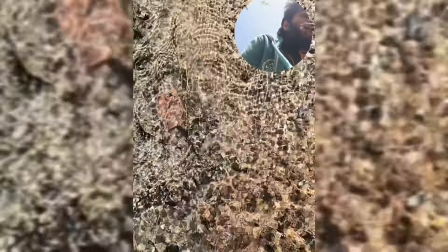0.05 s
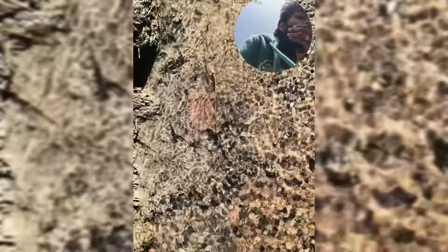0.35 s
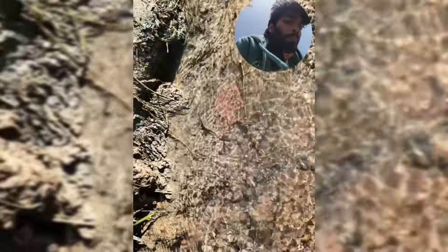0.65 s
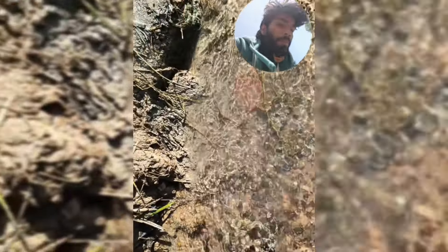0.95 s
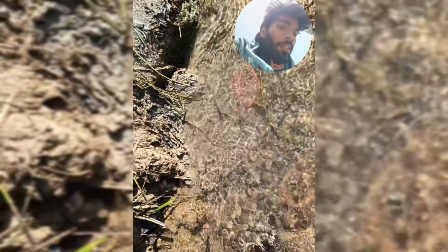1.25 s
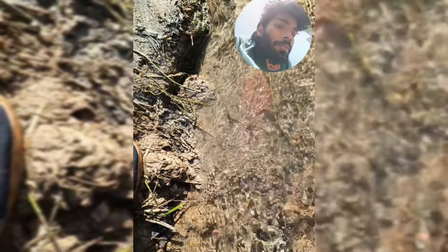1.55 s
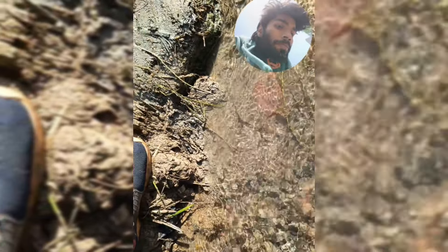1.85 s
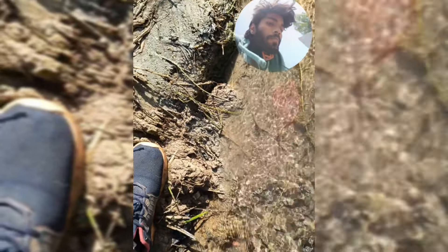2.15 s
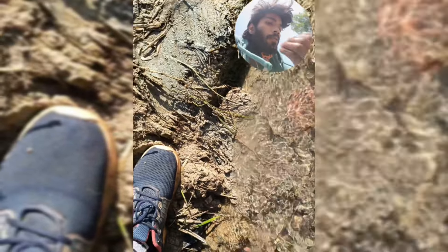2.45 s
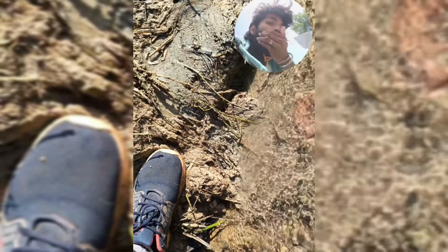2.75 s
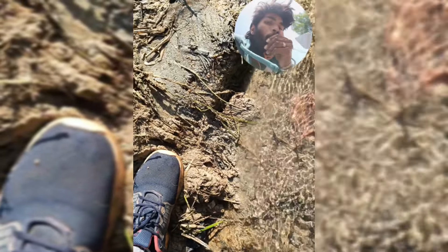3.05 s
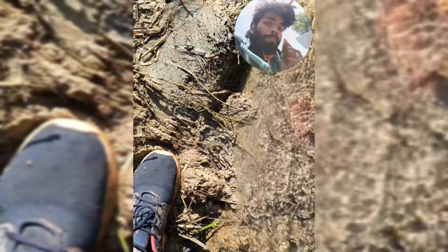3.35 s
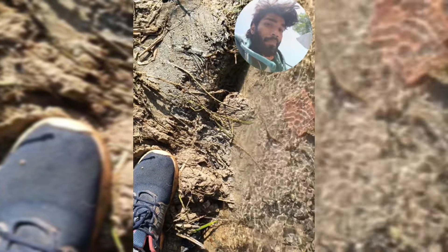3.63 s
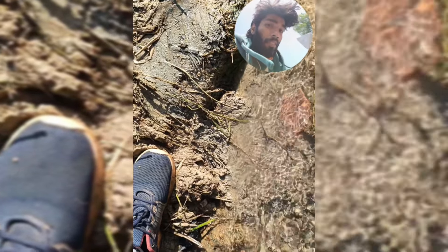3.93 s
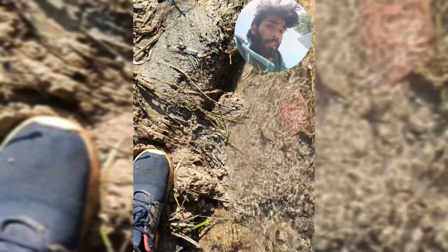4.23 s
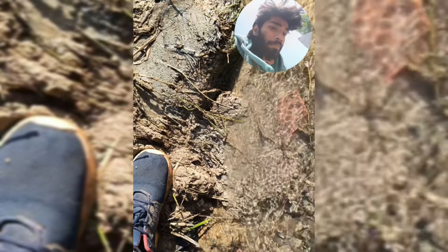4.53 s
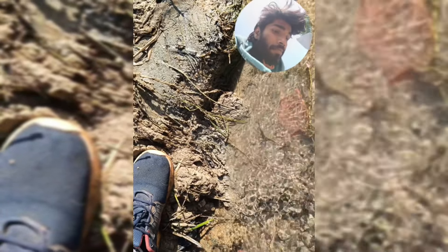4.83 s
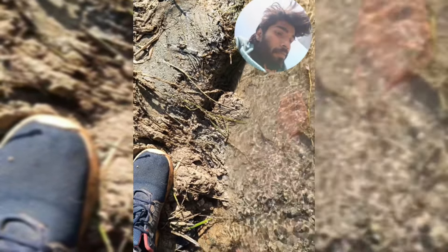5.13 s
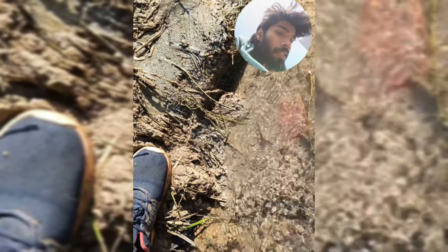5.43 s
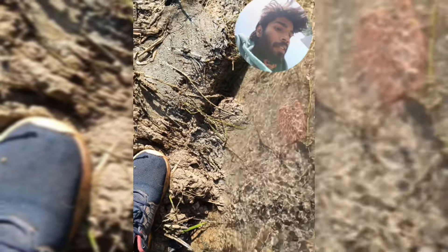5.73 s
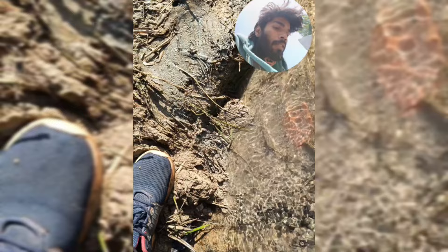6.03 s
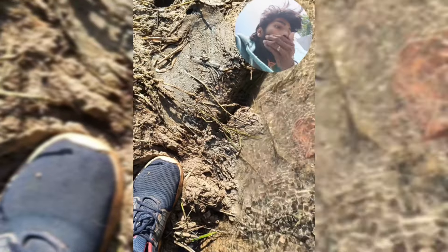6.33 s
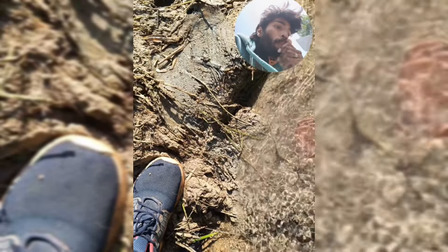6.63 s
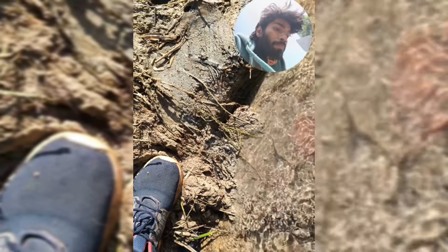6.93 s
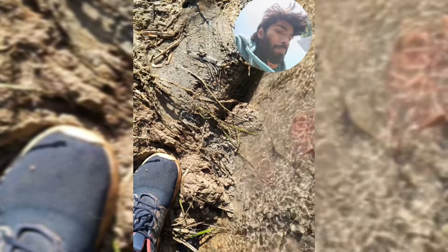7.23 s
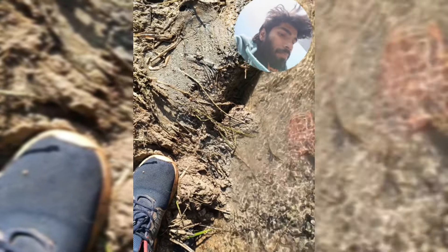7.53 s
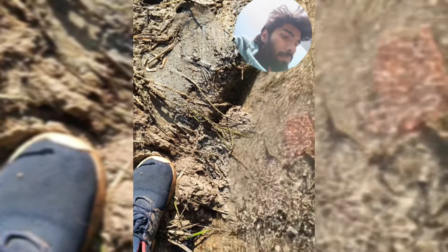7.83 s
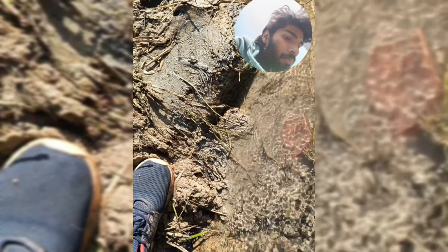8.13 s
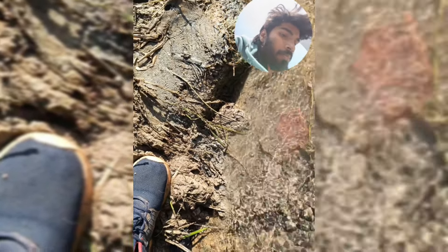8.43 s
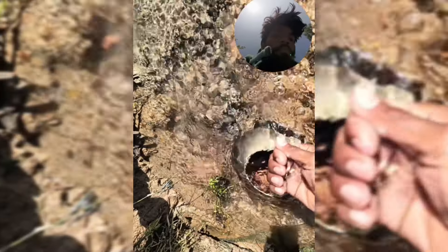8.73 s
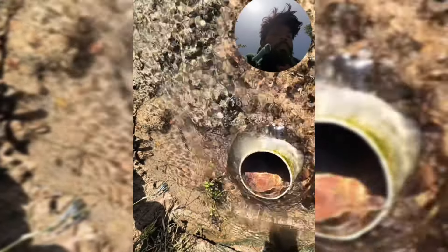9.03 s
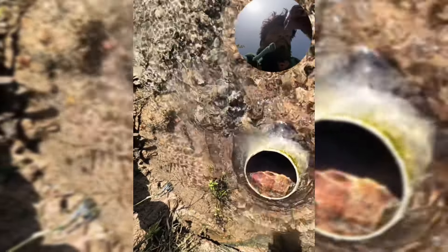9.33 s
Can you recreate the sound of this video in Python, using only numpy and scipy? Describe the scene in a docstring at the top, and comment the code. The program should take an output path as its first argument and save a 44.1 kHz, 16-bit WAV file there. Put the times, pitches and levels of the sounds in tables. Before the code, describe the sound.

Close to the microphone, a small outdoor stream gurgles and plops as it runs from a pipe. Irregular splashes and ticking droplets come throughout as a hand dips into the flow. A person slurps from the palm at the start, again a little later and once past the middle, with soft gulps between. A light wind rumbles underneath and thumps the microphone twice around halfway.

```python
"""Bubbles plop and chirp over a fine gurgle as water wells out of an old pipe and runs down a shallow ditch.
Each bubble rings with a short note, higher the smaller it is. A hand scoops from the flow and spills it
again: every splash churns the stream and throws up spray, and twice an air pocket opens with a falling
whistle. Sips slurped from the palm ring the mouth, and swallows ring the throat.
A light wind rumbles on the two microphones."""
import sys
import numpy as np
from scipy import signal
from scipy.fft import rfft, irfft, next_fast_len
from scipy.io import wavfile
from scipy.ndimage import map_coordinates

SR = 44100
rng = np.random.default_rng(int(sys.argv[2]) if len(sys.argv) > 2 else 0)


def store_wav(level_fs):
    """Save 16-bit WAV to argv[1]."""
    pcm = np.round(np.clip(np.atleast_2d(level_fs), -1, 1) * 32767)
    wavfile.write(sys.argv[1], SR, pcm.T.astype(np.int16))


N = 422478
TIME = np.arange(N) / SR
MIDDLING_CHURN_DB = -44  # churning counts as hard above this level

# How the water's sound sits between the two microphones; it shifts near 8.6 s. Each row: time in seconds, delay
# at the left microphone in ms, left minus right in dB, boost of the finest spray in dB.
WATER_STEREO = [(8.55, 0.28, 3.5, 0.5), (8.8, 0.061, 6.5, 1.5)]
# The hand stirs or spills the water. Each row: time it is fully built up in seconds,
# build-up in seconds, hold in seconds, churn level in dB, spray level in dB.
SPLASHES = [(0.134, .08, .2, -47, -58), (0.768, .14, .11, -45, -50), (1.023, 0.032, .47, -50, -61),
            (1.707, .03, .17, -36, -48), (1.898, .03, .14, -37, -45), (2.048, .02, .17, -43, -53),
            (2.325, .02, .14, -45, -54), (2.819, .08, .11, -42, -49.5), (3.11, .03, .16, -43, -45),
            (3.323, .03, .1, -48, -51), (3.671, .03, .04, -49, -49), (4.148, .04, .2, -46, -65.5),
            (4.655, .03, .19, -50.5, -68), (5.304, .015, .05, -39, -48.5), (5.412, .07, .27, -36, -47),
            (5.82, .02, .2, -43, -52.5), (6.076, .03, .06, -43, -46.5), (6.35, .05, .17, -44, -54),
            (6.712, .05, .27, -52.5, -54), (7.104, .03, .12, -52, -63), (7.412, .02, .03, -53.5, -61),
            (7.989, .18, .1, -48, -52.5), (8.193, .08, .16, -32, -41), (8.45, .05, .17, -37, -47),
            (8.738, .03, .17, -39.5, -48), (9.001, .03, .26, -41, -53), (9.42, .07, .14, -39, -49)]
# The tone of a tiny tick of water. Each row: frequency in Hz, gain in dB.
TICK_TONE = [(1000, -1), (3500, 8.5), (7000, 14), (8300, -18.5), (16000, -7)]


def amp(db):
    """Turn decibels into a gain."""
    return 10 ** (np.asarray(db) / 20)


def unit(x):
    """Scale x to an average (rms) level of 1."""
    return x / np.sqrt(np.mean(x ** 2) + 1e-20)


def along(points, hz):
    """Read between (Hz, value) points on a log frequency scale."""
    frequencies, values = np.transpose(points)
    return np.interp(np.log(hz + 1), np.log(frequencies + 1), values)


def curves(rows, when):
    """Read each column after the time at the given moments."""
    times, *columns = np.transpose(rows)
    return [np.interp(when, times, column) for column in columns]


def wobble(rate):
    """A smooth random curve through `rate` new values a second."""
    return map_coordinates(rng.standard_normal(int(N * rate / SR) + 4), [TIME * rate])


def filtered(x, response):
    """Give each frequency in x the gain response(hz)."""
    size = next_fast_len(N + SR // 2)
    return irfft(rfft(x, size) * response(np.fft.rfftfreq(size, 1 / SR)), size)[..., :N]


def coloured(x, tone):
    """Shape x with (Hz, dB) points, then scale it to level 1."""
    return unit(filtered(x, lambda hz: amp(along(tone, hz))))


def noise_pair(shared):
    """White noise for two microphones, with a share in common."""
    return np.sqrt(shared) * rng.standard_normal(N) + np.sqrt(1 - shared) * rng.standard_normal((2, N))


def add(out, start, sound):
    """Mix a sound in at `start` seconds."""
    room = out[..., max(0, round(start * SR)):][..., :sound.shape[-1]]
    room += sound[..., :room.shape[-1]]


def wind():
    """Wind rumbles on the microphones, more on the right; a puff is a few slow swings of pressure."""
    # The wind's strength. Each row: time in seconds, level in dB.
    strength = [(0, -52), (5.3, -53), (5.45, -44.5), (5.8, -47), (5.95, -49.5), (9.58, -55.5)]
    # The rumble's tone. Each row: frequency in Hz, gain in dB.
    rumble_tone = [(15, -6), (30, 1), (50, 3.5), (80, -4.5), (125, -11), (250, -22.5), (500, -26.5),
                   (2000, -54), (10000, -48)]
    # Thumping puffs. Each row: start in seconds, length in seconds, level in dB, pitch in Hz.
    puffs = [(5.357, 0.066, -26.5, 53), (5.722, 0.1, -30.5, 42)]
    air = amp(curves(strength, TIME)[0] + 3.1 * wobble(14)) * coloured(noise_pair(.78), rumble_tone)
    for start, length, db, hz in puffs:
        t = np.arange(int(length * SR)) / SR
        swings = np.sin(2 * np.pi * hz * t + rng.standard_normal((2, 1)))
        add(air, start, amp(db) * np.hanning(len(t)) * swings)
    return air * amp([[-2.5], [2.5]])


def bank_echo(water):
    """The earth banks and the restless surface scatter a very short echo that keeps changing."""
    # The echo's length. Each row: frequency in Hz, seconds to fade by 60 dB.
    fade_times = [(300, 0.11), (1500, 0.052), (10000, 0.047)]
    hz, t, noise = signal.stft(rng.standard_normal((4, 2, SR // 6)), SR, nperseg=128)
    tails = signal.istft(noise * amp(-60 * t / along(fade_times, hz)[:, None]), SR, nperseg=128)[1]
    shares = np.array([wobble(12) for _ in tails])  # the sound drifts among four echoes
    shares /= np.linalg.norm(shares, axis=0)
    echo = np.zeros((2, N))
    for share, tail in zip(shares, tails):
        delayed = np.pad(water * share, ((0, 0), (SR // 400, 0)))
        echo += signal.fftconvolve(delayed, tail / np.linalg.norm(tail[0]), axes=1)[:, :N]
    return echo


def gulps(squeezes_per_s=135, ring_s=.0041, fall_octaves_per_s=2.4):
    """A swallow squeezes water down the throat; each squeeze rings a hollow note, lower than the last."""
    # Each row: start in seconds, length in seconds, level in dB, pitch in Hz, overtone gain in dB.
    swallows = [(1.384, .019, -30.5, 356, -1), (1.412, .008, -29.5, 410, -23),
                (3.49, .006, -35.5, 392, -15), (7.649, .033, -29.5, 532, -33)]
    out, t = np.zeros(N), np.arange(SR // 40) / SR
    knock = (1 - np.exp(-2 * t / ring_s)) * np.exp(-(t / ring_s) ** 2)
    for start, length, db, hz, overtone_db in swallows:
        for after in np.arange(0, length, 1 / squeezes_per_s):
            jitter, strength = rng.uniform(-1.2, 1, 2)
            phase = 2 * np.pi * hz * 2 ** (-fall_octaves_per_s * after) * t
            note = np.sin(phase) + amp(overtone_db) * np.sin(2 * phase)
            add(out, start + after + .0013 * jitter, amp(db + 3 * strength) * knock / knock.max() * note)
    return out


def mouth(hz):
    """How the hollow of the mouth answers a push at the lips, at each frequency."""
    # The notes the mouth rings at. Each row: pitch in Hz, width in Hz, gain in dB.
    resonances = [(327, 166, -3.5), (563, 280, -8.5), (1355, 300, 0.5), (1714, 210, 6.5), (3440, 620, -51)]
    # The tone of the lips touching. Each row: frequency in Hz, gain in dB.
    lip_tone = [(100, 1.5), (180, -8), (270, 7), (3500, -12.5), (7000, -12), (8500, -66), (16000, -33)]
    ringing = sum(amp(db) * 1j * hz * width / (pitch ** 2 - hz ** 2 + 1j * hz * width)
                  for pitch, width, db in resonances)
    return ringing * amp(along(lip_tone, hz))


def sips():
    """Smacking lips and sputtering water ring the mouth, which takes a new shape for each sip."""
    # Each row: start in seconds, end in seconds, level in dB, factor on the mouth's pitches.
    slurps = [(0.198, 0.252, -32.5, 1.01), (0.319, 0.366, -32, 0.91), (2.663, 2.927, -36, 1.013),
              (6.335, 6.526, -35.5, 1.086)]
    # Each row: time in seconds, strength in dB, softness of the touch in ms.
    lip_smacks = [(0.213, -29, .2), (0.223, -7, 0.35), (0.234, -12.5, 0.25), (0.336, -25, .2),
                  (2.754, -8, 0.2), (2.783, -12.5, 0.16), (2.833, -18, .25), (2.874, -18, 0.087),
                  (6.339, -20, .3), (6.369, -13.5, 0.35), (6.388, -23.5, .25), (6.449, -10, 0.39),
                  (6.47, -21, 0.21)]
    out = np.zeros((2, N))
    sputter = noise_pair(.85) * amp(3 * np.clip(wobble(300), -2, 1.5) + 4 * np.clip(wobble(90), -2, 1.2))
    sputter /= np.std(filtered(sputter, mouth))
    for start, end, level_db, shape in slurps:
        smacks, suction = np.zeros(N), np.zeros(N)
        add(suction, start, amp(level_db) * signal.windows.tukey(int((end - start) * SR), .3))
        for when, db, soft_ms in lip_smacks:
            if start - .05 < when < end + .05:
                touch = signal.windows.gaussian(SR // 250, soft_ms * SR / 1000)
                add(smacks, when - .002, amp(db + 30) * touch / touch.sum())
        out += filtered(smacks + suction * sputter, lambda hz: mouth(hz / shape))
    return out


def splash_level(peaks_db, calm_db, fall_db_per_s, sag_db_per_s=5):
    """Level in dB of the calm stream plus its splashes: each builds up, sags as it holds and dies away."""
    power = np.full(N, amp(calm_db) ** 2)
    for (peak_time, build, hold, *_), db in zip(SPLASHES, peaks_db):
        t = np.arange(int((build + hold + .5) * SR)) / SR - build
        lost_db = sag_db_per_s * np.maximum(t, 0) + fall_db_per_s * np.maximum(t - hold, 0)
        add(power, peak_time - build, (np.minimum(1 + t / build, 1) * amp(db - lost_db)) ** 2)
    return 10 * np.log10(power)


def bubble_notes(rows, scatter_ms, onset):
    """Each bubble is a short sine: it swells as it pinches off, glides as it nears the surface, and dies."""
    out = np.zeros((2, N))
    lags_ms = curves(WATER_STEREO, np.transpose(rows)[0])[0] + scatter_ms * rng.standard_normal(len(rows))
    for (start, db, hz, life, glide, pan_db), lag in zip(rows, lags_ms / 1000):
        t = np.maximum(np.arange(int(4 * life * SR) + 32) / SR - [[lag / 2], [-lag / 2]], 0)
        pitch = hz * 2 ** (.8 * np.tanh(glide * t / .8))  # glides 0.8 octaves at most
        phase = 2 * np.pi * np.cumsum(pitch * np.diff(t, prepend=0), axis=1)
        swell = (1 - np.exp(-t / (onset * life))) * np.exp(-(t / life) ** 1.5)
        add(out, start, amp([[db + pan_db / 2], [db - pan_db / 2]]) * swell * np.sin(phase))
    return out


def swarm(level_db, count, low_hz, high_hz, cycles, rise, spread_db):
    """Random bubbles at level 1: small ones are high and brief; in splashes they crowd and are cut short."""
    when, smallness, strength = rng.random((count, 3)).T
    lasting, bend, side = rng.standard_normal((count, 3)).T
    crowd_db = .25 * level_db
    births = np.cumsum(amp(crowd_db) ** 2)
    starts = np.interp(when, births / births[-1], TIME)
    hz = low_hz * (high_hz / low_hz) ** smallness
    crowding_db = np.interp(starts, TIME, crowd_db - crowd_db.mean())
    life = cycles / hz * np.exp(np.minimum(lasting, 1) / 2) * amp(-.7 * crowding_db)
    db = spread_db * strength - crowding_db / 2
    glide = rise * (1 + 2 * bend) / life
    rows = np.transpose([starts, db, hz, life, glide, 2 * side])
    return unit(bubble_notes(rows, scatter_ms=.13, onset=.35))


def gurgle(churn_db, wash_db=-8.5, murmur_db=-59.5):
    """Middle-sized bubbles drown in a wash as the stream churns harder; farther down, the ditch murmurs."""
    # The tone of rushing water. Each row: frequency in Hz, gain in dB.
    wash_tone = [(180, -6.5), (380, -8), (620, -3.5), (850, -5.5), (1250, 1), (1900, -6), (2700, -13.5),
                 (5000, -25), (10000, -65)]
    harder_db = churn_db - MIDDLING_CHURN_DB
    crowd = swarm(churn_db, count=1900, low_hz=520, high_hz=2700, cycles=8, rise=.02, spread_db=14)
    bubbles = coloured(crowd, [(300, -30), (600, -11), (1100, 1.5), (1900, 2.5), (3000, -7.5)])
    bubbles *= amp(-.15 * np.maximum(harder_db, 0))
    wash = coloured(noise_pair(.35) * amp(4 * np.clip(wobble(130), -2, 1.7)), wash_tone)
    murmur = coloured(noise_pair(.35) * amp(4 * wobble(40)), wash_tone)
    return amp(churn_db) * (bubbles + amp(wash_db + .2 * harder_db) * wash) + amp(murmur_db) * murmur


def trickle(churn_db):
    """Small bubbles tinkle and larger ones plop all the time; hard churning drags big ones under to glug."""
    small = swarm(churn_db, count=900, low_hz=2000, high_hz=5200, cycles=4.5, rise=0, spread_db=24)
    larger = swarm(churn_db, count=200, low_hz=600, high_hz=1300, cycles=7, rise=.025, spread_db=7)
    glugs = swarm(churn_db, count=260, low_hz=440, high_hz=880, cycles=6, rise=.03, spread_db=7)
    harder_db = churn_db - MIDDLING_CHURN_DB
    flow = amp(.4 * harder_db)
    return flow * (amp(-62) * small + amp(-46) * larger) + amp(-58 + 2.3 * harder_db) * glugs


def spray(spray_db, middling_db=-54, drops_per_s=450):
    """Tiny bubbles tinkle, droplets tick, bursting films crackle and fine drops patter in clumps."""
    # The tone of the fine drops. Each row: frequency in Hz, gain in dB.
    patter_tone = [(800, -30), (2000, -14), (3500, 10), (5000, 4), (6900, 5.5), (8200, -7), (12000, -4),
                   (16000, -7.5)]
    tinkle = swarm(spray_db, count=1500, low_hz=2300, high_hz=7300, cycles=10, rise=.015, spread_db=14)
    tinkle *= amp(2.2 * wobble(900))
    droplets = swarm(spray_db, count=420, low_hz=2000, high_hz=8000, cycles=6, rise=.03, spread_db=20)
    bursts = swarm(spray_db, count=2000, low_hz=2500, high_hz=15000, cycles=6, rise=0, spread_db=25)
    crackle = coloured(bursts, [(2500, -7), (4000, -2), (6900, 2), (8300, -4), (15000, -2)])
    drops = (rng.random(N) < drops_per_s / SR) * amp(16 * rng.random(N))
    drop_fades = np.sqrt(signal.lfilter([1], [1, -np.exp(-1 / (.0016 * SR))], drops ** 2))
    patter = coloured(drop_fades * noise_pair(.016), patter_tone)
    clumps = unit(amp(5.5 * np.clip(wobble(80), -2, 1.6)))
    thick = amp(.2 * (spray_db - middling_db))  # thick spray turns from single notes to patter
    fine = amp(-3.5) * crackle + amp(-6.5) * thick * patter
    fine *= clumps * amp(curves(WATER_STEREO, TIME)[2])
    return amp(spray_db) * (amp(-7) * tinkle + amp(-4) * droplets / thick + fine)


def slaps(spray_db, sharpness=4.6):
    """A drop hits with a tick and spatter that ring the dent it makes; stray drops fall at random."""
    # Each row: start in seconds, strength in dB, pitch in Hz, fade time of the spatter in ms.
    drops = [(0.1912, -28.5, 2140, 1.9), (0.3072, -22.5, 2490, 0.81), (0.355, -35, 1500, 2.2),
             (0.664, -32, 5700, 2.7), (1.1675, -40, 2430, 2.8), (1.3473, -43, 4840, 4.5),
             (1.4435, -38, 3920, 2), (1.718, -30.5, 2680, 6.3), (2.399, -35.5, 3800, 3.6),
             (2.4369, -29.5, 4600, 1.8), (2.88, -17, 3500, 1.7), (2.9074, -26, 1810, 3.2),
             (3.202, -31, 1480, .7), (3.2199, -28, 2350, 5), (3.345, -32, 2800, 7.4),
             (3.684, -35.5, 6400, 4.6), (5.3315, -24.5, 1940, 8.6), (5.5086, -22.5, 1870, 2.4),
             (5.692, -29.5, 2430, 2.5), (5.8216, -28, 2170, 1.9), (6.074, -36, 3330, 2.5),
             (6.4, -21, 3150, 2.2), (6.407, -29, 1520, 2.7), (6.4804, -26.5, 2000, 0.43),
             (6.5085, -36, 1860, 0.91), (6.703, -33.5, 6550, 2.4), (6.7646, -31.5, 6200, 1.8),
             (6.8381, -28.5, 3240, 1.9), (6.8793, -34, 6730, 4), (6.902, -38, 2380, 2),
             (6.9242, -32, 5640, 4.7), (7.429, -43, 3730, 1.9), (8.642, -29, 940, 2.5),
             (8.966, -31, 1920, 5.3), (8.9873, -33, 2110, 5.9), (9.2397, -29, 2080, 2.1),
             (9.5076, -33, 1815, 2.2), (9.5196, -22, 1940, 1.6)]
    ticks, dents, t = np.zeros((2, N)), np.zeros((2, N)), np.arange(SR // 20) / SR
    moment, strength, smallness = rng.random((90, 3)).T
    when = TIME[-1] * moment
    stray_db = np.interp(when, TIME, spray_db) + 3.5 + 20 * strength
    strays = zip(when, stray_db, 2500 * 3 ** smallness, 1 + strength)
    for start, db, hz, spatter_ms in [*drops, *strays]:
        fade = np.exp(-1000 * t / spatter_ms) + .12 * np.exp(-t / .007)
        burst = amp(db) * fade * rng.standard_normal((2, len(t)))
        note = signal.lfilter(*signal.iirpeak(hz, sharpness, SR), burst)
        add(ticks, start, burst)
        add(dents, start, note * np.sqrt(sharpness * SR / (np.pi * hz)))
    return dents + amp(-13.5) * filtered(ticks, lambda hz: amp(along(TICK_TONE, hz)))


def air_pockets(first_hz=3020, doubles_s=.019, peak_s=.061, length_s=.187, fade_db_per_s=207):
    """An air pocket widens steadily, so its wavering note falls with the square root of its volume."""
    # Each row: start in seconds, level in dB.
    openings = [(4.21, -24), (9.05, -28)]
    out, t = np.zeros((2, N)), np.arange(int(length_s * SR)) / SR
    swell = signal.windows.tukey(len(t), .1) * amp(-fade_db_per_s * abs(t - peak_s))
    for start, db in openings:
        hz = first_hz / np.sqrt(1 + t / doubles_s) * (1 + .04 * wobble(300)[:len(t)])
        delay = curves(WATER_STEREO, start)[0] / 1000 * np.array([[1], [0]])  # left side only
        phase = 2 * np.pi * (np.cumsum(hz) / SR - hz * delay)
        flutter = amp(3.5 * wobble(150)[:len(t)])
        add(out, start, amp(db) * flutter * swell * np.sin(phase))
    return out


def plops():
    """The loud single bubbles, each born with a faint tick and ruffled by the moving surface."""
    # Each row: start in seconds, level in dB, pitch in Hz, rate of rise in octaves per life,
    # life in cycles, left minus right in dB from the middle of the stream.
    bubbles = [(0.1051, -21, 1965, 0.2, 10.5, -6), (0.1139, -29, 647, -0.08, 12.6, -2),
               (0.1302, -21.5, 3060, 0.3, 8.9, -1), (0.2539, -25.5, 1450, -0.2, 4.6, -1),
               (0.5901, -20, 1840, -0.04, 9.6, 2.5), (0.7658, -29, 2055, 0.1, 11.5, 0),
               (0.7933, -19.5, 5450, 0.2, 9.6, 2), (0.8463, -25.5, 2240, 0.08, 12.4, 2),
               (0.8684, -26.5, 3730, -0.18, 15, -2), (1.15, -33.5, 734, 0.09, 9.4, -5),
               (1.373, -27, 1085, -0, 17, -3), (1.3781, -26, 2030, -0.14, 11, -3.5),
               (1.3977, -24, 1580, 0.03, 10.5, 8), (1.4461, -27, 690, -0.04, 7.8, -1),
               (1.5873, -16.5, 800, -0.03, 9.4, 0.5), (1.6072, -29.5, 546, -0.13, 20.4, 1),
               (1.6474, -22.5, 2850, 0, 5.1, 2), (1.6732, -20.5, 1860, -0.03, 9.2, -3),
               (1.7631, -23, 552, 0.15, 9, -6), (1.7969, -27, 875, -0.03, 9.8, 5),
               (1.8469, -22.5, 1750, -0.01, 11.9, -1), (1.9088, -16, 2000, -0.03, 6.3, 0.5),
               (1.9405, -19.5, 814, 0.09, 5.0, 2), (1.9986, -35, 621, 0.1, 39, -1),
               (2.0437, -20.5, 667, -0.04, 11.3, -1), (2.0536, -24.5, 1310, 0.73, 18.4, -6.5),
               (2.1191, -16, 2960, 0.12, 12, 1), (2.1458, -27.5, 1254, 0.44, 16, -1),
               (2.1927, -22.0, 723, -0.11, 9.9, -5), (2.2239, -23, 1766, 0.21, 7.6, -4),
               (2.3164, -30, 743, -0.03, 13, 0), (2.3965, -21.5, 1420, 0.02, 6.9, 4),
               (2.453, -17.5, 1201, -0.07, 4.6, -1), (2.6466, -5, 6440, 0.18, 3.9, 2),
               (2.7966, -6.5, 1334, -0.24, 2.4, -0.5), (2.8459, -8.5, 999, 0.06, 2.8, -1),
               (2.9389, -18.5, 1004, 0.11, 13.3, -3), (3.0756, -12.5, 4250, 0.1, 11.7, 1),
               (3.1065, -20, 2030, -0.06, 7.2, 1), (3.2001, -25.5, 577.5, -0.03, 15, 3),
               (3.2227, -8, 6800, -0.4, 1.8, 0), (3.2728, -14.5, 1280, 0.58, 6.4, 1),
               (3.3755, -36, 719, 0.05, 9.7, -4), (3.4279, -23.5, 1230, 0.1, 6.6, 0.5),
               (3.4325, -29, 827, -0.2, 12, 4), (4.1604, -25.5, 4680, 0.16, 17, -6),
               (4.2625, -27.5, 683, 0.08, 14, -1), (4.6539, -27.5, 783, -0.11, 12, 5),
               (4.8382, -27.5, 1720, 0.34, 22, -6.5), (5.4097, -18.5, 1066, 0.57, 8, 8),
               (5.5129, -20, 842, 0.04, 7.3, 0), (5.588, -17, 1870, 0.05, 11, -5),
               (5.6612, -14.0, 4030, 0.09, 14, 9), (5.6863, -20, 1430, -0.28, 8.1, -4),
               (5.7617, -22.5, 2200, 0.06, 8.8, 5), (5.9253, -22, 713, 0.03, 4.7, -2),
               (6.099, -31, 523, 0.58, 16.7, -3), (6.095, -20, 3303, -0.01, 11.6, -2),
               (6.1204, -27.5, 807, -0.08, 12.5, -1), (6.1557, -19.5, 6200, 0.1, 12, 4),
               (6.2063, -28, 544, 0.18, 16.4, -1), (6.2728, -32, 1440, 0.16, 7.7, -7),
               (6.5323, -27, 1132, 0, 10.7, -2), (6.838, -33, 3130, 0.05, 7.7, -9),
               (6.8666, -46, 551, 0.1, 31.3, -5), (6.878, -16, 2130, 0.34, 9.8, 1),
               (6.8816, -17.5, 6660, -0, 5.8, -7), (7.0557, -46, 649, -0.01, 15, -3),
               (7.1572, -28.5, 748, -0.06, 16.6, -2), (7.1745, -33, 584, 0.08, 23, -2),
               (7.5638, -31.0, 588, -0.02, 19.7, -2), (8.1307, -22.5, 790, 0.3, 13, 0),
               (8.1826, -22.5, 706, 0.24, 18, 0), (8.2716, -24, 287, 0.24, 11.5, -5),
               (8.2968, -21, 3378, 0.02, 7.4, -9), (8.333, -13.5, 624, 0.57, 3.7, 0),
               (8.3682, -19, 1730, 0.2, 17, 5), (8.406, -28, 282, 0.18, 5.7, -1),
               (8.4357, -12.5, 750, 0.16, 5, 0), (8.5103, -19.0, 767, 0.14, 9.2, -2),
               (8.5423, -18, 585, -0.01, 5.5, -3), (8.5847, -24.5, 1840, -0.2, 45, -4),
               (8.6186, -19.5, 793, -0.06, 9.4, -1), (8.6417, -16, 1910, 0.04, 4.4, -9),
               (8.7481, -16.5, 1780, 0.33, 13.4, -7), (8.7946, -16.5, 1330, 0.01, 4.1, -2),
               (8.8211, -25.0, 1379, -0.02, 17, 0), (8.8705, -21, 1150, -0.05, 11.6, 1),
               (8.8996, -17.5, 2110, -0.02, 14.4, -6.5), (8.9362, -21.5, 1510, -0, 3.9, 5),
               (8.9926, -17, 1020, 0.06, 5.2, 9), (9.007, -28.5, 600, 0.14, 6.4, 2),
               (9.2011, -25, 1845, 0.3, 12, -5), (9.3833, -23.5, 3042, 0.04, 7.9, 1),
               (9.4131, -21, 4150, 0.1, 8.9, -4), (9.4418, -23, 1013, 0.23, 15, 3),
               (9.4553, -25, 610, 0.02, 16.6, 1)]
    rows = [(start, db, hz, cycles / hz, rise * hz / cycles, pan_db)
            for start, db, hz, rise, cycles, pan_db in bubbles]
    notes = bubble_notes(rows, scatter_ms=.1, onset=.16)
    ticks, t = np.zeros((2, N)), np.arange(SR // 100) / SR
    for start, db, *_ in bubbles:
        add(ticks, start, amp(db - 31.5) * np.exp(-t / .0045) * rng.standard_normal((2, len(t))))
    ruffle = amp(2.5 * np.clip(wobble(350), -2, 1))
    return notes * ruffle + filtered(ticks, lambda hz: amp(along(TICK_TONE, hz)))


def scene():
    """The water in its ditch, the drinking and the wind."""
    # A tilt of the water's sound to the right. Each row: frequency in Hz, left minus right in dB.
    lean = [(400, -2), (700, -5), (1100, -3), (1850, -9.5), (2800, -5.5), (8000, -5.5), (13000, -11.5)]
    *_, churn_peaks, spray_peaks = np.transpose(SPLASHES)
    churn_db = splash_level(churn_peaks, calm_db=-58.5, fall_db_per_s=110)
    spray_db = splash_level(spray_peaks, calm_db=-68, fall_db_per_s=170.5)  # spray settles sooner
    water = plops() + air_pockets() + gurgle(churn_db) + trickle(churn_db)
    water += spray(spray_db) + slaps(spray_db)
    sides = [[.5], [-.5]]  # half of the dB is added on the left, half taken from the right
    water *= amp(curves(WATER_STEREO, TIME)[1] * sides)
    water += amp(-10) * bank_echo(water)
    water = filtered(water, lambda hz: amp(along(lean, hz) * sides))
    return water + sips() + gulps() + wind()


def record(dry):
    """Cut off the very highest treble."""
    return filtered(dry, lambda hz: hz < 16100)


dry = scene()
out = record(dry)
store_wav(out)
```